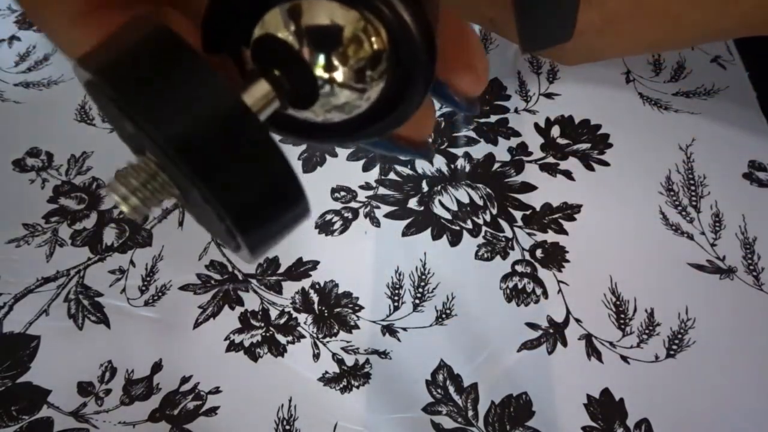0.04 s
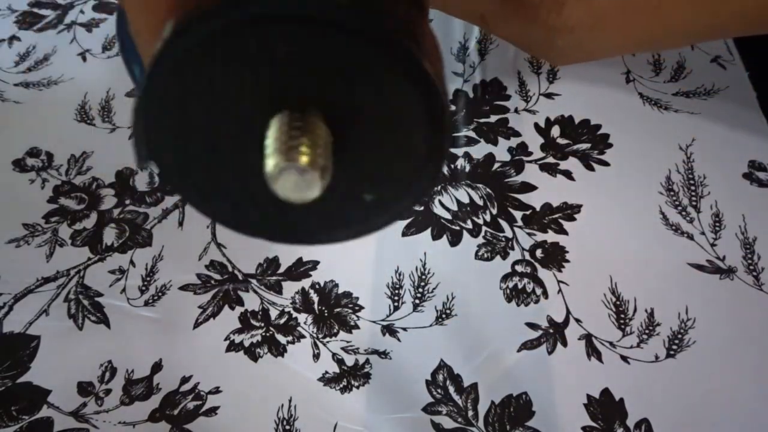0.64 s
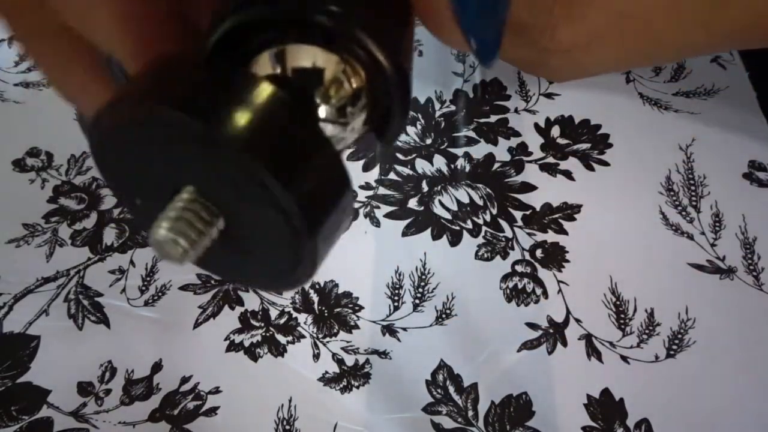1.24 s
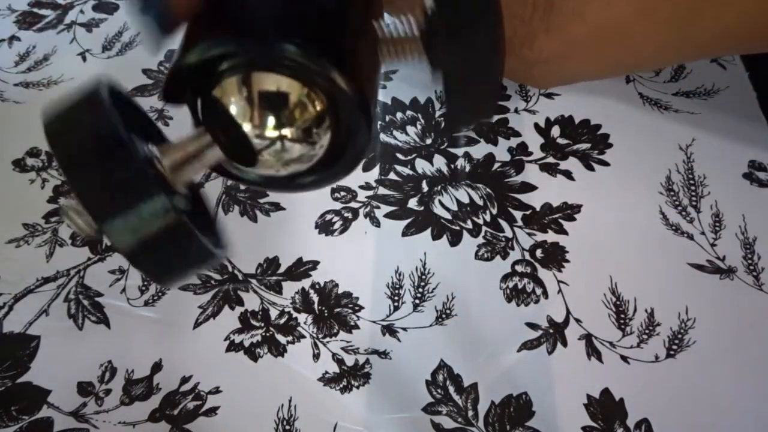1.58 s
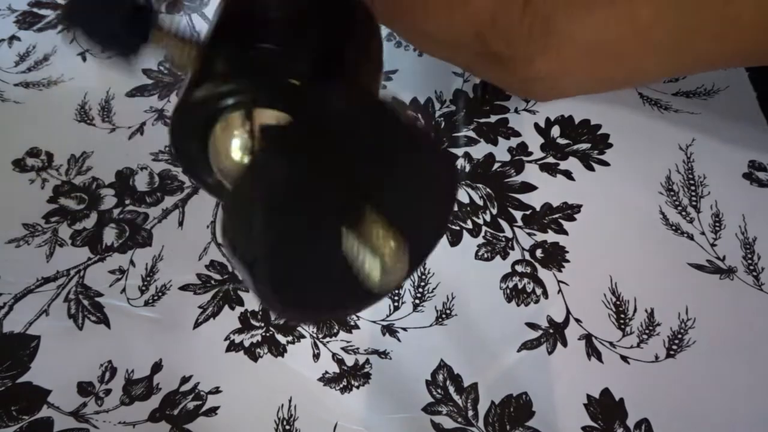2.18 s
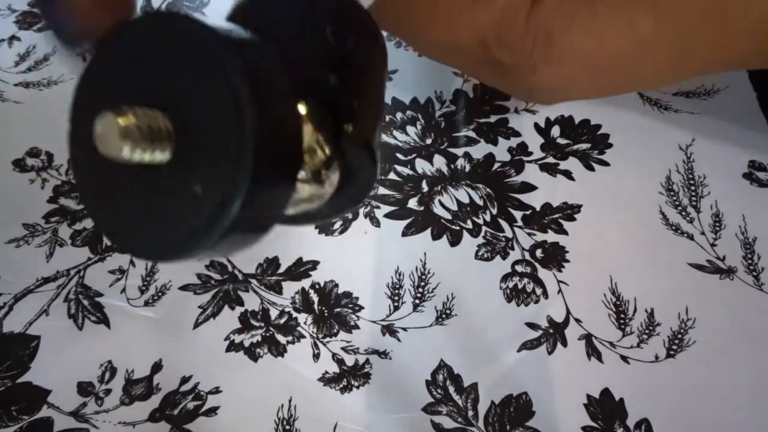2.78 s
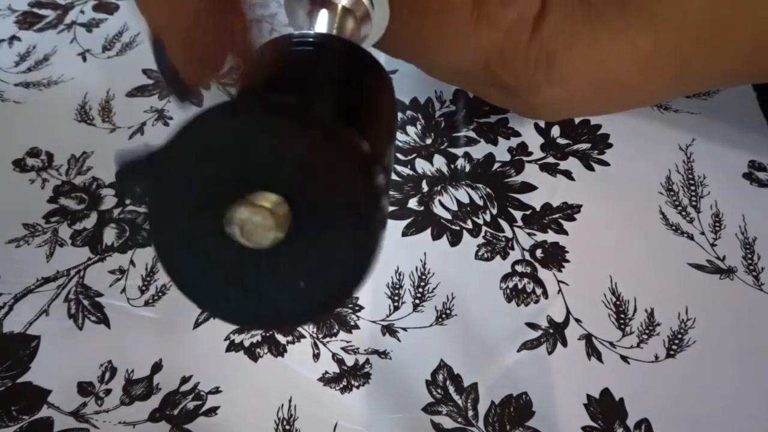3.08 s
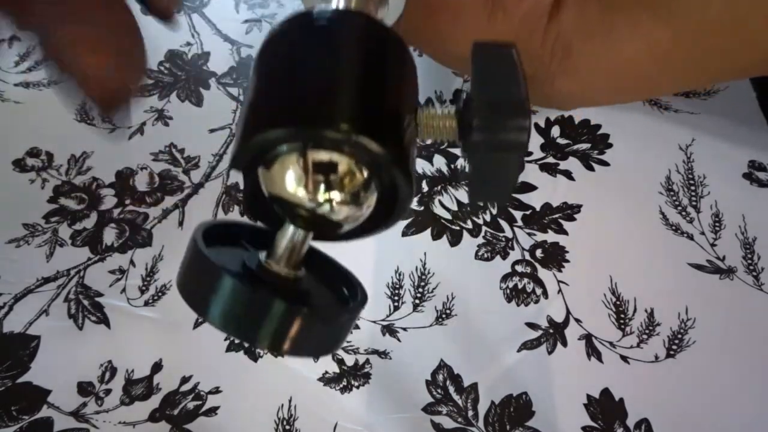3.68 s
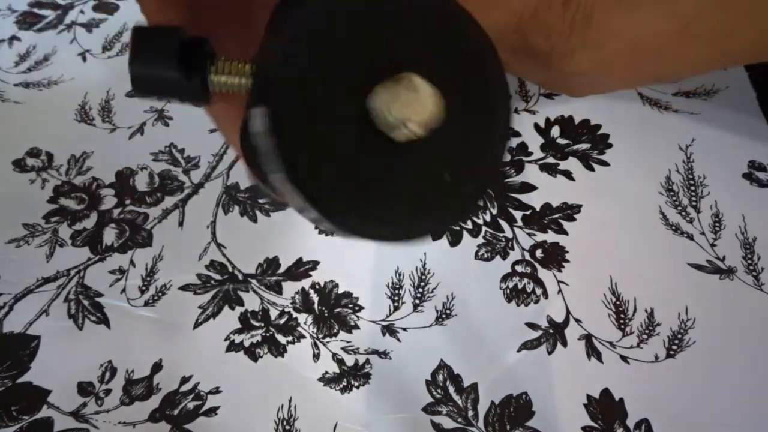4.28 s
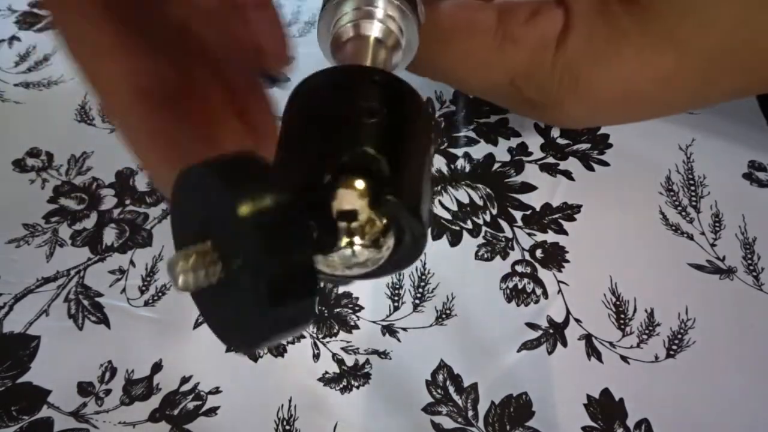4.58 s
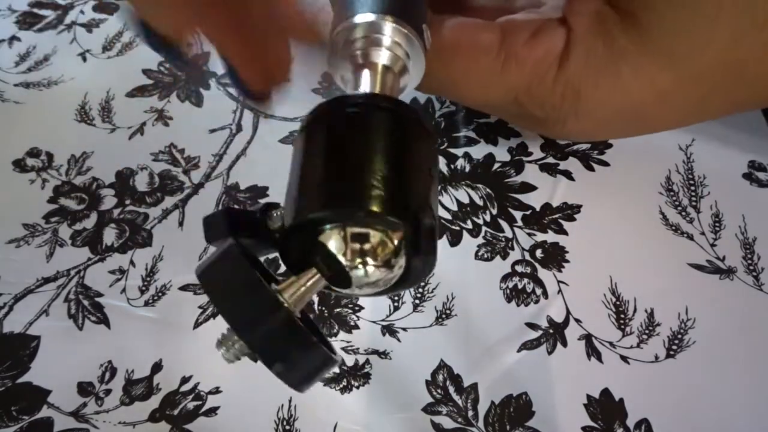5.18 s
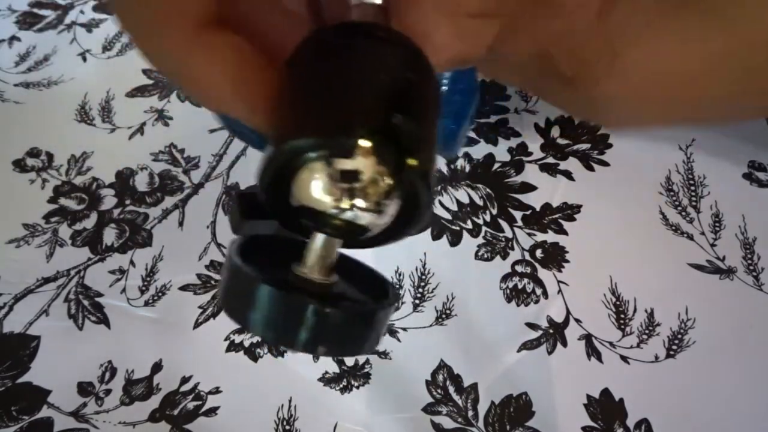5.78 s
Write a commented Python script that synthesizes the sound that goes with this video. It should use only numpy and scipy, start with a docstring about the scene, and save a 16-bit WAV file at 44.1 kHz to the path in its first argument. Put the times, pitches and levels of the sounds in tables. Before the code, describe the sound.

Close, uneven flurries of small clicks and brief scrapes as fingers swivel a loose camera ball head indoors, over faint hiss.

```python
"""A small camera ball head is turned in the fingers, close by, over a faint hiss and a low wavering drone.
At first fingers rub and tap, and the parts scrape, with a few lone clicks and a chink of the steel stem.
From 2 s the loose steel ball and plastic plate strike the socket in short flurries, loudest near 3.5 s;
each impact excites the mount's resonances, and a small, quiet room answers.
After 5.2 s the clicks weaken, and soft taps and a faint scrape end the handling."""
import sys
import numpy as np
from scipy import signal
from scipy.fft import rfft, irfft, next_fast_len
from scipy.io import wavfile

SR = 44100
rng = np.random.default_rng(int(sys.argv[2]) if len(sys.argv) > 2 else 0)


def put_to_file(sound):
    """Save the sound as 16-bit audio at rate SR, in the file named by the first command-line argument."""
    columns = np.atleast_2d(sound).T  # one column per channel
    safe = np.clip(columns, -1, 1)
    whole_steps = np.round(safe * 32767)
    wavfile.write(sys.argv[1], SR, whole_steps.astype(np.int16))


N = 261943


def amp(db):
    """Amplitude ratio of a level in decibels."""
    return 10 ** (np.asarray(db) / 20)


def unit(x):
    """Normalisation to an rms of 1."""
    return x / np.sqrt(np.mean(x ** 2) + 1e-20)


def along(points, hz):
    """Interpolation of (frequency, value) points on a logarithmic frequency axis."""
    f, v = np.transpose(points)
    return np.interp(np.log(hz + 1), np.log(f), v)


def filtered(x, response):
    """Linear filtering: the spectrum is multiplied by a frequency response."""
    n = x.shape[-1]
    m = next_fast_len(n + 4096)
    return irfft(rfft(x, m) * response(np.fft.rfftfreq(m, 1 / SR)), m)[..., :n]


def add(track, s, x):
    """Superposition: x joins the track at s seconds."""
    i = max(0, round(s * SR))
    part = track[..., i:i + x.shape[-1]]
    part += x[..., :part.shape[-1]]


def band(hz, lo, hi, order=3):
    """Response of a causal band-pass filter."""
    b, a = signal.butter(order, [lo, hi], "band", analog=True)
    return signal.freqs(b, a, hz)[1]


def resonance(hz, centre, width):
    """Response of a damped harmonic oscillator, 1 at its centre frequency."""
    return 1j * hz * width / (centre ** 2 - hz ** 2 + 1j * hz * width)


# likeness of diffuse sound at the two ears: (frequency [Hz], correlation [-])
COHERENCE = [(100, 0.93), (1000, 0.4), (4000, 0.083), (12000, 0.083)]
def diffuse(count):
    """Diffuse field: the noise at the two ears grows less coherent as frequency rises."""
    def weights(hz):
        angle = np.arccos(along(COHERENCE, hz)) / 2
        return np.array([np.cos(angle), np.sin(angle)])
    mid, side = filtered(rng.standard_normal((2, count)), weights)
    return np.array([mid + side, mid - side])


# spectrum of the hiss: (frequency [Hz], relative spectral density [dB])
HISS_SPECTRUM = [(30, -43), (85, -26), (150, -10), (220, -12.5), (300, -1.5), (450, -3.5), (900, -1.5),
                 (2000, 1.5), (4000, -1.5), (8000, -5), (13000, -10), (16000, -16.5)]
def hiss(level_db=-65.5):
    """Stationary broadband noise forms an even floor."""
    return amp(level_db) * unit(filtered(diffuse(N), lambda hz: amp(along(HISS_SPECTRUM, hz))))


# swell of the faint, distant drone: (time [s], relative level [dB])
DRONE_SWELL = [(0.0, -78), (0.41, -94), (0.73, -77), (0.78, -97), (2.07, -99), (2.28, -72), (3.44, -88.5),
               (3.59, -71.5), (3.89, -91), (5.38, -77.5), (5.89, -87.5), (5.94, -96)]
def drone(pitch_hz=301, blur_hz=10, gain_db=0.5):
    """Amplitude modulation by slow noise spreads a tone into a narrow, wavering band."""
    t = np.arange(N) / SR
    swell_db = gain_db + np.interp(t, *np.transpose(DRONE_SWELL))
    waver = filtered(diffuse(N), lambda hz: 1 / (1 + 1j * hz / blur_hz) / (1 + 1j * hz / 60) ** 2)
    return amp(swell_db) * unit(waver * np.sin(2 * np.pi * pitch_hz * t))


# the registers knock, clack, ring and zing, and the room's answer in each:
# (lower edge [Hz], upper edge [Hz], gain into the room [dB], reverberation time [s])
REGISTER_BANDS = [(759, 2830, 4, 0.28), (2070, 4610, -3.5, 0.17), (5220, 9200, -5, 0.2),
                  (8800, 14000, -6.5, 0.21)]
def room(x, build_up_s=0.00055, late_db=-26, late_t60=0.82, segments=20):
    """Short room reverberation: fresh random tails are cross-faded so that no pitch lingers."""
    t = np.arange(SR // 2) / SR
    t60 = [(np.sqrt(lo * hi), seconds) for lo, hi, _, seconds in REGISTER_BANDS]
    out, hop = np.zeros((2, N)), N // segments
    for start in range(0, N - hop, hop):
        hz, age, spectra = signal.stft(diffuse(len(t)), SR, nperseg=256)
        fade = amp(-60 * age / along(t60, hz)[:, None]) + amp(late_db - 60 * age / late_t60)
        tail = signal.istft(spectra * fade, SR, nperseg=256)[1][:, :len(t)]
        tail *= 1 - np.exp(-t / build_up_s)
        part = x[start:start + 2 * hop]
        part = part * np.sin(np.pi * np.arange(len(part)) / (2 * hop))  # one answer fades into the next
        add(out, start / SR, signal.fftconvolve(part[None], unit(tail) / np.sqrt(len(t)), axes=1))
    return out


# lasting modes of the metal parts: (frequency [Hz], bandwidth [Hz], relative gain [dB])
METAL_MODES = [(936.4, 9.7, 7.5), (1225, 23, 8.5), (2040, 5.6, -3.5), (2285, 26, 9.5), (2715, 126, 4),
               (3214, 74, -3), (3470, 11, -15.5), (3970, 20, -31), (4140, 43, 2.5), (12200, 27, -1)]
def metal(hz):
    """Light damping: narrow resonances ring on after a blow."""
    return sum(amp(db) * resonance(hz, centre, width) for centre, width, db in METAL_MODES)


# damped modes of the mount: (frequency [Hz], bandwidth [Hz], relative gain [dB])
MOUNT_MODES = [(893, 502, -1.5), (1267, 950, 1.5), (1890, 1395, -0.5), (3226, 408, 6), (3990, 830, 2.5),
               (5220, 960, 4), (6906, 1050, 2.5), (9200, 1400, -4), (11460, 930, 5), (14800, 2600, -5.5)]
def mount(hz):
    """Modal superposition: broad resonances of alternating sign sum to the mount's response."""
    return sum((-1) ** k * amp(db) * resonance(hz, centre, width)
               for k, (centre, width, db) in enumerate(MOUNT_MODES))


def strokes(rows):
    """Amplitude envelope of sliding friction: each stroke swells, holds and lets go."""
    envelope = np.zeros(N)
    for s, length, db in rows:
        add(envelope, s, amp(db) * signal.windows.tukey(round(length * SR), .5))
    return envelope


# skin brushing over the mount: (time [s], duration [s], level [dB])
SKIN_STROKES = [(.3, .1, -67), (1.002, 0.016, -49.5), (1.125, 0.069, -66)]
def rubs(band_hz=(4500, 11400)):
    """Friction noise: dry skin gives a light, high swish."""
    return strokes(SKIN_STROKES) * unit(filtered(diffuse(N), lambda hz: band(hz, *band_hz, order=1)))


# parts sliding on each other: (time [s], duration [s], level [dB])
SLIDES = [(.115, 0.04, -64.5), (0.487, .035, -60), (1.106, 0.065, -68.5), (1.444, 0.089, -58),
          (1.573, .05, -48), (1.991, 0.072, -45), (2.116, .041, -59.5), (2.185, .028, -45.5),
          (2.639, 0.053, -51), (3.049, 0.018, -45), (3.476, 0.042, -40), (3.95, 0.05, -52.5),
          (4.752, 0.042, -49), (4.82, .073, -51.5), (5.115, .098, -46.5), (5.49, 0.021, -45),
          (5.771, .28, -67)]
def scrapes(slips_per_s=2000, scatter_db=2.5, stereo_width=0.29):
    """Stick-slip friction: tiny uneven slips excite the mount's modes."""
    sizes = amp(scatter_db * np.minimum(rng.exponential(size=N), 4))
    slipping = rng.random(N) < slips_per_s / SR
    mid, side = sizes * slipping * np.sign(rng.standard_normal((2, N)))
    slips = np.array([mid + stereo_width * side, mid - stereo_width * side])
    # (frequency [Hz], relative gain [dB])
    colour = [(400, 1.5), (800, 9.5), (2000, 11.5), (4000, -0.5), (7000, -15), (15000, -14.5)]
    return strokes(SLIDES) * unit(filtered(slips, lambda hz: mount(hz) * amp(along(colour, hz))))


def catches(per_slide=2, gain_db=-2.5, scatter_db=2.5, hardness_db=-18, rattle_db=0.5):
    """Static friction: each slide catches at random, mostly in mid-stroke, louder in a louder slide."""
    return [(s + length * rng.beta(2, 2), db + gain_db + scatter_db * rng.standard_normal(),
             hardness_db, rattle_db) for s, length, db in SLIDES for _ in range(per_slide)]


BURST_SAMPLES = 2048
def burst(colours, decay_s, attack_s, stereo_width):
    """Impulsive excitation: micro-impacts give each register the energy of 4 ms at an rms of 1."""
    t = np.arange(BURST_SAMPLES) / SR
    mid, side = rng.standard_normal((2, len(colours), BURST_SAMPLES))
    envelope = np.exp(-t / decay_s) * (1 - np.exp(-t / attack_s))
    force = np.array([mid + stereo_width * side, mid - stereo_width * side]) * envelope
    sound = irfft(rfft(force) * colours)
    energy = np.mean(np.sum(sound ** 2, -1, keepdims=True), 0)
    return sound * np.sqrt(.004 * SR / energy)


def impacts(contacts, cushion_hz=np.inf, thud_db=-42, lead_in_db=-18, lead_in_s=0.0045, grip_spread=0.033):
    """Impact response: contacts (time [s], register levels [dB], rattle [dB]) give direct sound, rattle."""
    hz = np.fft.rfftfreq(BURST_SAMPLES, 1 / SR)
    bands = np.array([band(hz, lo, hi) for lo, hi, _, _ in REGISTER_BANDS])
    send_db = np.array(REGISTER_BANDS)[:, 2]
    cushion = 1 / (1 + 1j * hz / cushion_hz) ** 2
    thud = amp(thud_db) / (1 + 1j * hz / REGISTER_BANDS[0][0])  # the clack nudges the whole mount
    direct, rattle = np.zeros((2, N)), np.zeros(N)
    for s, levels_db, rattle_db in contacts:
        colours = bands * mount(hz) * cushion
        grip = np.exp(grip_spread * rng.standard_normal())  # the grip shifts the plastic's resonances
        colours[1] = bands[1] * mount(hz * grip) * cushion + thud
        blow = burst(colours, decay_s=0.0012, attack_s=0.0001, stereo_width=0.61)
        add(direct, s, amp(levels_db) @ blow)
        # a faint noise lead-in softens each click's attack
        lead_in = burst(colours, decay_s=0.012, attack_s=0.0029, stereo_width=0.28)
        add(direct, s - lead_in_s, amp(levels_db + lead_in_db) @ lead_in)
        # the after-rattle drives the room and the metal's modes
        shake = burst(colours, decay_s=0.0022, attack_s=0.00078, stereo_width=0)[0]
        add(rattle, s, amp(levels_db + send_db + rattle_db) @ shake)
    return direct, rattle


# fingers tapping the plastic: (time [s], clack level [dB])
FINGER_TAPS = [(.355, -53.5), (0.4044, -52), (0.4245, -57), (0.492, -52), (.734, -56.5), (.781, -58),
               (.987, -46.5), (1.2832, -48.5), (1.464, -54), (2.1563, -44), (2.2267, -46.5), (2.9292, -45),
               (3.949, -49.5), (4.035, -45), (4.3022, -46), (4.3221, -45.5), (4.3329, -46), (4.3613, -44.5),
               (4.3811, -45.5), (4.5351, -41.5), (4.6885, -53.5), (4.9437, -52.5), (5.2937, -54.5),
               (5.3615, -56), (5.565, -55.5), (5.7598, -52), (5.8258, -51.5)]
def taps(knock_db=-3, ring_db=-13, zing_db=-18, rattle_db=1):
    """Contact compliance: a soft finger cushions the blow and dulls its treble."""
    colour_db = np.array([knock_db, 0, ring_db, zing_db])
    return impacts([(s, db + colour_db, rattle_db) for s, db in FINGER_TAPS], cushion_hz=4200)


# the steel stem striking the socket's rim: (time [s], clack level [dB])
STEM_STRIKES = [(1.5021, -59.5), (1.5717, -36), (3.0544, -40.5), (3.5026, -38.5), (4.3936, -46),
                (4.8067, -37.5)]
def chinks(knock_db=-3, ring_db=10.5, zing_db=-4.5, rattle_db=-4.5):
    """Resonance: energy gathered in the ring register gives the blow a pitch."""
    colour_db = np.array([knock_db, 0, ring_db, zing_db])
    return impacts([(s, db + colour_db, rattle_db) for s, db in STEM_STRIKES])


# ball and plate striking the socket:
# (time [s], clack level [dB], hardness as zing over clack [dB], after-rattle gain [dB])
SOCKET_STRIKES = [(0.2591, -45, -17.5, 0.5), (.6514, -43.5, -11.5, 0.5), (.926, -64, 2, -9),
                  (1.6172, -52, 7.5, 0.5), (2.0038, -41.5, -12, 13), (2.0095, -46.5, 14, -8),
                  (2.0534, -39.5, -38, 3), (2.0856, -49, 1, 1), (2.1445, -47, -4, -3), (2.171, -40.5, 5, 1),
                  (2.1899, -38, 7, -12), (2.5009, -42, -16, 2), (2.5295, -36.5, -26, -9),
                  (2.5676, -25, -9.5, -3.5), (2.6655, -48, 18, -6), (2.67, -36.5, -11, 5.5),
                  (2.7186, -46, -9, 3), (2.9563, -35, -11.5, -1.5), (3.0439, -53.5, 15, -8),
                  (3.0629, -23, -7, 1.5), (3.1039, -37, 4.5, -3), (3.3854, -46, -18, 4.5),
                  (3.3972, -35, -17, 10), (3.4023, -27.5, -5, -2.5), (3.451, -37.5, -11, 8.5),
                  (3.4623, -38, -2, -7), (3.488, -28, -4.5, 5), (3.5125, -32, -28, 6),
                  (3.5255, -19.5, -12.5, -2), (3.5546, -29, -29, 0), (3.5647, -33, -40, -10),
                  (3.9679, -37.5, -20, -9), (3.986, -47, 12.5, -4), (4.0002, -35.5, -19, 0),
                  (4.014, -36.5, 5, -3.5), (4.164, -30.5, -17, 0.5), (4.4107, -31, -14, -2),
                  (4.4293, -47.5, 18.5, -8), (4.4463, -28.5, -22, -1), (4.4637, -47, 15.5, -7),
                  (4.7281, -34.5, -9.5, -0.5), (4.7436, -35.5, -26, -7), (4.8141, -26.5, -15, -1.5),
                  (4.8356, -31, -29, 1), (4.845, -28.5, -18, -4), (4.865, -30.5, -12, 0),
                  (4.893, -48, 13.5, -4.5), (5.1175, -53, 12, 3), (5.1254, -28.5, -5, 3),
                  (5.1829, -33, -22, -1), (5.196, -51, 19.5, -8), (5.443, -39, -42, 1.5),
                  (5.4882, -54.5, 8.5, 2), (5.5018, -52.5, 4.5, -4)]
def clicks(medium_db=-36.5):
    """Contact time sets the spectrum: strong, hard blows are shorter and knock less; hard ones ring more."""
    contacts = []
    for s, db, hardness_db, rattle_db in SOCKET_STRIKES + catches():
        knock_db = -8.5 - 0.37 * (db - medium_db) - 0.066 * hardness_db
        ring_db = 0.5 + 0.59 * hardness_db
        contacts.append((s, db + np.array([knock_db, 0, ring_db, hardness_db]), rattle_db))
    return impacts(contacts)


# the mount is held to the left: (frequency [Hz], left minus right level [dB])
LEFT_BIAS = [(300, -2), (1000, 2.5), (2500, 0), (6000, 3), (10000, 0.3)]
def scene(scrape_send_db=-2, room_db=-2, metal_db=-3):
    """Direct and reverberant sound add; an interaural level difference places the mount."""
    direct, rattle = map(sum, zip(clicks(), chinks(), taps()))
    sliding = scrapes()
    drive = rattle + amp(scrape_send_db) * sliding.mean(0)
    ringing = amp(metal_db) * filtered(drive, metal)
    handling = direct + sliding + rubs() + ringing + amp(room_db) * room(drive)
    placed = filtered(handling, lambda hz: amp(np.outer([.5, -.5], along(LEFT_BIAS, hz))))
    return placed + hiss() + drone()


def record(dry, cutoff_hz=16300):
    """Band limiting: a steep low-pass filter removes the highest treble."""
    return filtered(dry, lambda hz: 1 / np.sqrt(1 + (hz / cutoff_hz) ** 160))


dry = scene()
out = record(dry)
put_to_file(out)
```